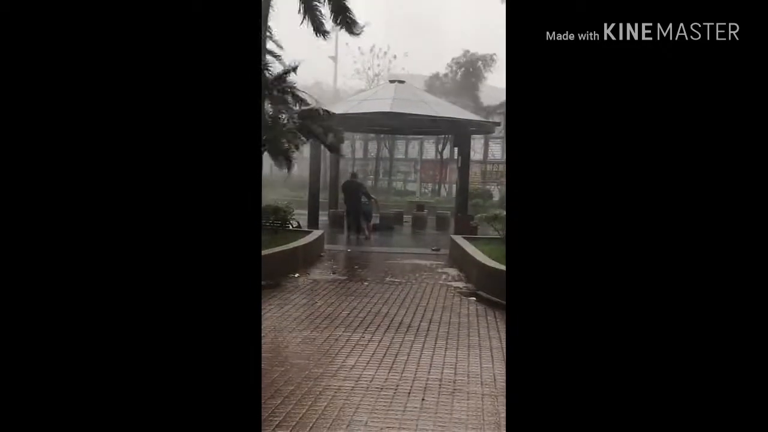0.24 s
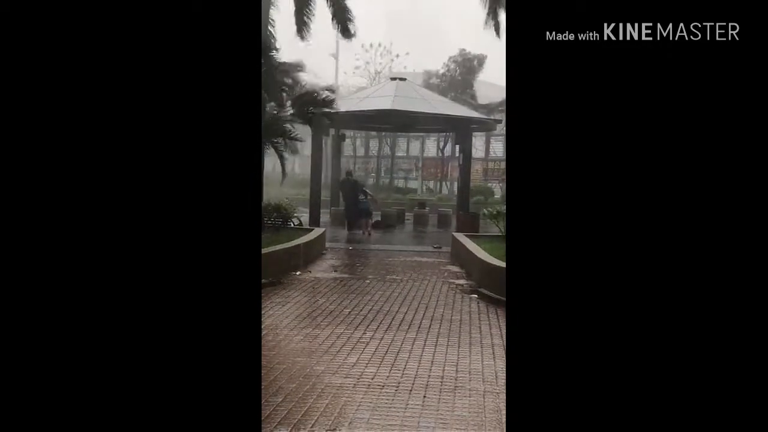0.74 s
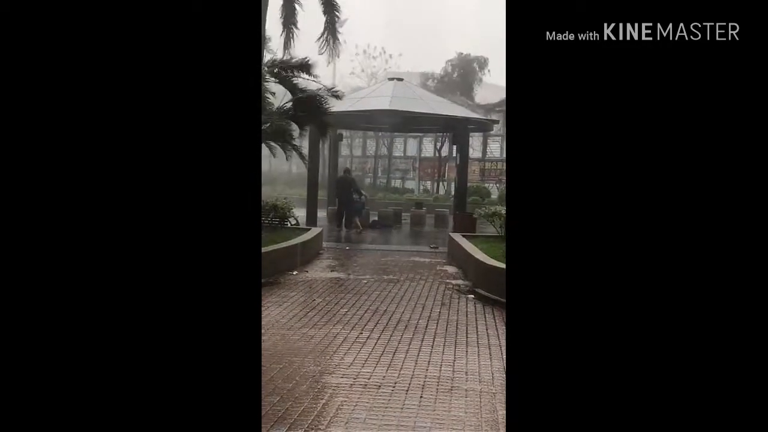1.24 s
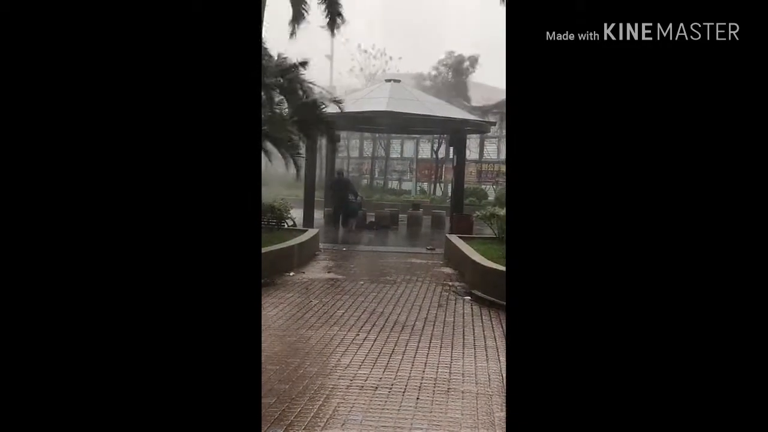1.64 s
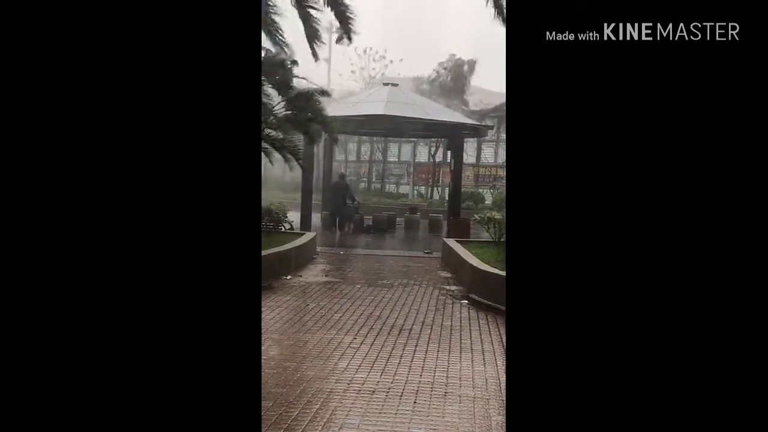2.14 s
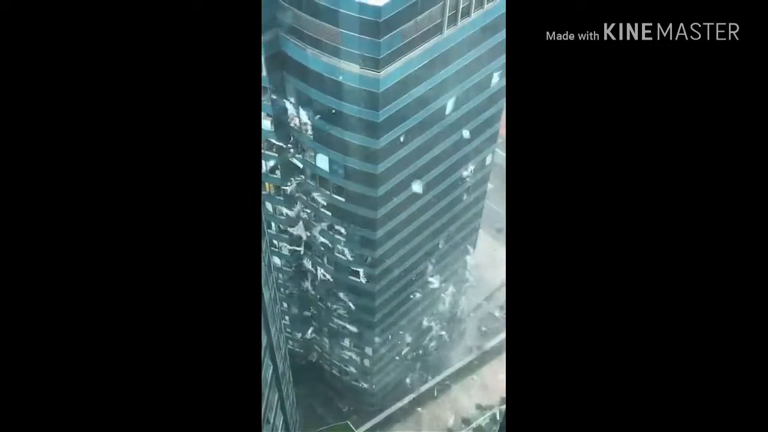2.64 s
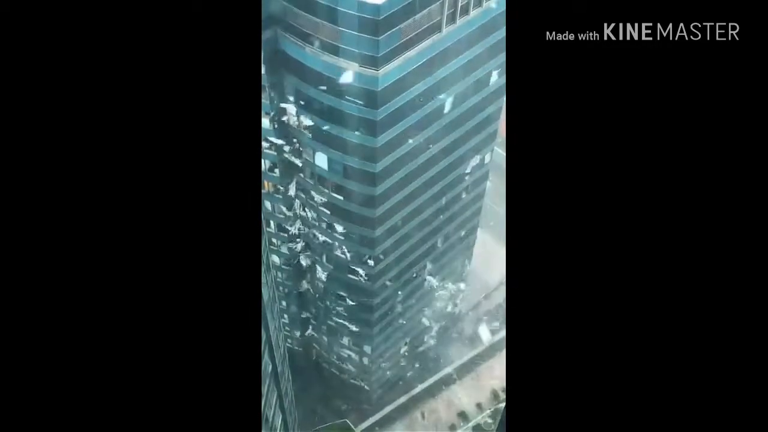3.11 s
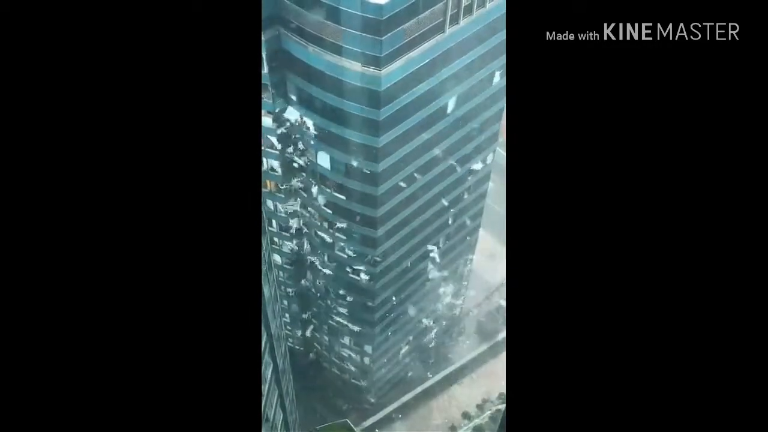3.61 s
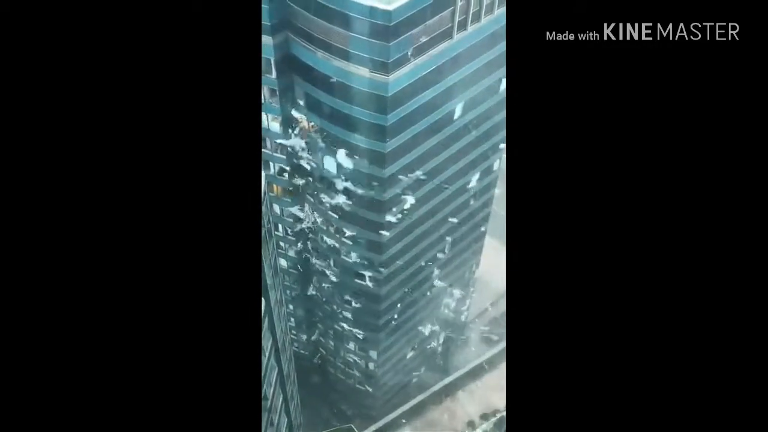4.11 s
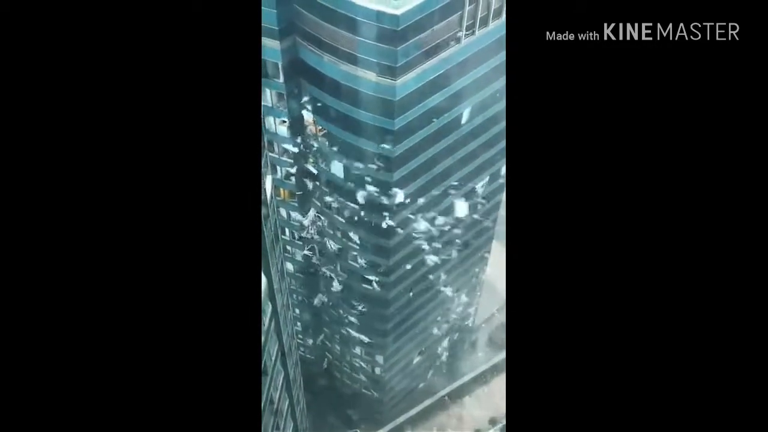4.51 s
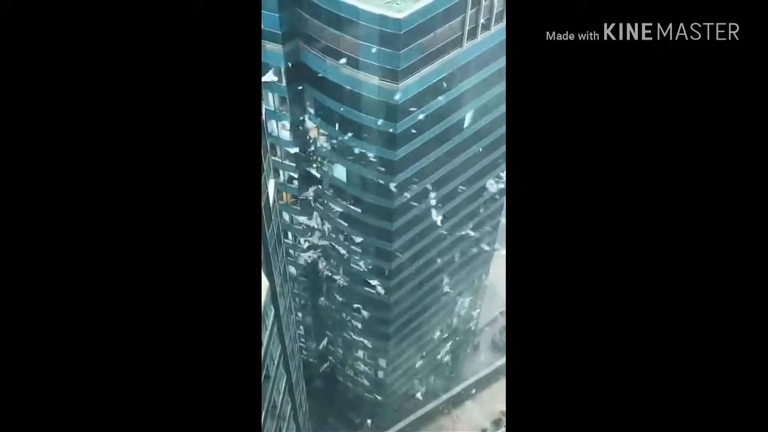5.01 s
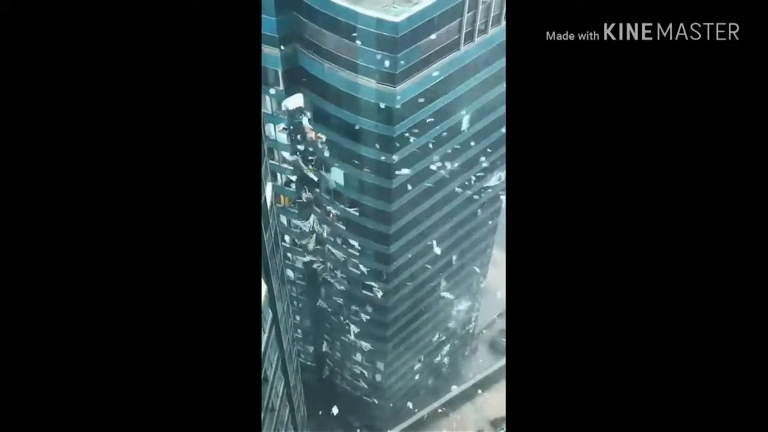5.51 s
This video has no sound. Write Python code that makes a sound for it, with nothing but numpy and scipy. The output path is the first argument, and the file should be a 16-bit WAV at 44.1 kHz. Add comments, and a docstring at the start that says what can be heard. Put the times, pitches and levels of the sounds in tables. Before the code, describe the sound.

A loud downpour and gusts outdoors cut to a muffled storm behind a high window, booming softly with faint whines and whistles.

```python
"""Dense rain hisses on paving and leaves around a microphone outdoors, while gusts buffet it.
That fades fast; then one hears the storm from behind a high window: the room booms at its low modes
and hums, wind leaks through the frame and rings it faintly, a slit whines, a gap whistles now and then.
Rain, gusts, boom and leak are shaped noise; drops and grit are wavelets; hum and whine are wandering
tones; knocks are decaying modes; whistles are narrow gliding noise. A bright hiss breaks in at the end."""
import sys
import numpy as np
from scipy import signal
from scipy.io import wavfile
from scipy.ndimage import uniform_filter1d

SR = 44100
rng = np.random.default_rng(int(sys.argv[2]) if len(sys.argv) > 2 else 0)


def pcm_store(signal):
    """Save signal as 16-bit PCM."""
    levels = np.round(np.clip(np.atleast_2d(signal), -1, 1) * 32767)
    wavfile.write(sys.argv[1], SR, levels.astype(np.int16).T)


N = 253573
T = np.arange(N) / SR  # s
INDOORS_START_S = 2.358


def gain_of(db):
    """Amplitude factor of a level in dB."""
    return 10 ** (np.asarray(db) / 20)


def evened(x):
    """Scale to an RMS of 1."""
    return x / np.sqrt(np.mean(x ** 2) + 1e-20)


def curve(points):
    """A level in dB for every sample, joined by straight lines."""
    t, db = np.transpose(points)
    return np.interp(T, t, db)


def read(points, hz):
    """A spectrum joined on a log axis, at -120 dB beyond its ends."""
    f, db = np.transpose(points)
    return np.interp(np.log(hz + 1), np.log(f + 1), db, left=-120, right=-120)


def wander(x, size):
    """Smooth white noise twice into a random drift of RMS 1; size in samples."""
    return evened(uniform_filter1d(uniform_filter1d(x, size=size), size=size))


def noise(spectrum, size, modes=(), patchy_db=0., flicker_db=0.):
    """Random short-time spectra with resonances, drifting patches and a flicker common to all pitches."""
    hop, hz = size // 4, np.fft.rfftfreq(size, 1 / SR)
    a, b, patches = rng.standard_normal((N // hop + 5, len(hz), 3)).T  # each: pitch by time
    patches = uniform_filter1d(patches, size=12, axis=0)
    patches = evened(uniform_filter1d(patches, size=10, axis=1))
    flicker = evened(uniform_filter1d(rng.standard_normal(a.shape[1]), size=5))
    resonances = sum(db / (1 + (2 * (hz - f) / width) ** 2) for f, width, db in modes)
    shape = gain_of(read(spectrum, hz) + resonances)
    frames = (a + 1j * b) * shape[:, None] * gain_of(patchy_db * patches + flicker_db * flicker)
    return evened(signal.istft(frames, nperseg=size, noverlap=size - hop)[1][:N])


def band_noise(low_hz, high_hz, size):
    """White noise through a third-order bandpass."""
    sos = signal.butter(3, [low_hz, high_hz], "band", fs=SR, output="sos")
    return signal.sosfilt(sos, rng.standard_normal(size))


def tick(hz, turns, rise=0.):
    """A drop's splash: a short wavelet of peak 1 whose pitch may rise as the bubble closes."""
    u = np.arange(-200, 200) / SR * hz  # cycles from the centre
    return np.cos(2 * np.pi * u * (1 + rise * u)) * np.exp(-.5 * (u / turns) ** 2)


def scatter(per_s, uneven_db, pitches, turns):
    """Wavelets at random moments, of uneven size and randomly chosen pitch."""
    size = gain_of(uneven_db * np.minimum(rng.exponential(1, N), 5))
    size = size * (rng.random(N) < per_s / SR)
    kind = rng.integers(0, len(pitches), N)
    layers = (signal.oaconvolve(size * (kind == k), tick(hz, turns), "same")
              for k, hz in enumerate(pitches))
    return evened(sum(layers))


def add(mix, s, sound):
    """Lay a sound into the mix from second s, cut at the end."""
    part = mix[round(s * SR):][:len(sound)]
    part += sound[:len(part)]


def drops():
    """Many near drops, each a wavelet of about one cycle."""
    return scatter(per_s=590, uneven_db=1.6, pitches=np.geomspace(2500, 11000, 16), turns=0.97)


def rain(storm_db):
    """Dense strikes merge into a hiss, with near drops on top; it follows the storm by a share."""
    # colour of the hiss: f/Hz, level/dB [relative, per Hz]
    colour = [(180, -34), (300, -8), (356, -3), (492, -12.5), (870, -4.5), (1720, -9.5), (3230, -10),
              (6080, -13.5), (9520, -18.5), (11300, -22), (12000, -32), (15600, -67), (22000, -120)]
    # evenly spaced hollows in the hiss: f/Hz, width/Hz, level/dB
    hollows = [(4930, 290, -3.5), (7620, 350, -3.5), (10300, 780, -3)]
    level_db, storm_share, drops_db = -32, 0.23, -17.5  # drops against the hiss
    hiss = noise(colour, size=512, modes=hollows, patchy_db=1.0, flicker_db=0.08)
    return gain_of(level_db + storm_share * storm_db) * evened(hiss + gain_of(drops_db) * drops())


def gusts(storm_db):
    """Wind buffets the microphone: low noise that follows the storm by a share."""
    # colour of the gusts: f/Hz, level/dB [relative, per Hz]
    colour = [(53, -33), (90, 3), (199, -5.5), (241, -4), (280, -9.5), (350, -8), (420, -17.5), (600, -15),
              (780, -28), (1320, -120)]
    level_db, storm_share = -32.5, 0.17
    return gain_of(level_db + storm_share * storm_db) * noise(colour, size=4096, patchy_db=0.7)


def thud(storm_db):
    """The deepest buffeting: noise that follows the storm fully."""
    # colour of the thud: f/Hz, level/dB [relative, per Hz]
    colour = [(12, -41), (20, -18), (54, 9.5), (110, 0), (140, -18), (240, -120)]
    return gain_of(-37.5 + storm_db) * noise(colour, size=8192)


def add_close_drops(mix):
    """Single drops strike close by, each a wavelet of rising pitch."""
    # close drops: t/s [centre], level/dB [peak], f/Hz
    close_drops = [(.4395, -24, 9000), (1.1280, -24, 8500), (1.7237, -19, 8200), (1.9925, -23, 6200)]
    for s, db, hz in close_drops:
        add(mix, s - 200 / SR, gain_of(db) * tick(hz, turns=1.7, rise=.09))


def outdoors():
    """Rain and wind at the open microphone, faded together."""
    # strength of the storm: t/s, level/dB [relative]
    storm = [(0, -3), (.2, 2), (1.3, 0), (1.75, -5), (2.0, -4), (2.25, -1.5)]
    # the outdoor sound dies away: t/s, level/dB [relative]
    fade = [(2.245, 0), (2.265, -8.5), (2.29, -10), (2.34, -19.5), (2.4, -22.5), (2.46, -46), (2.52, -56)]
    storm_db = curve(storm)
    out = rain(storm_db) + gusts(storm_db) + thud(storm_db)
    add_close_drops(out)
    return out * gain_of(curve(fade)) * (T < fade[-1][0])


def boom(wind_db):
    """The room resonates at its low modes and follows the wind by a share."""
    # colour of the boom: f/Hz, level/dB [relative, per Hz]
    colour = [(60, -33), (95, -7), (140, -1), (165, -9.5), (210, -6), (330, -21.5), (500, -13), (700, -56)]
    # low room modes: f/Hz, width/Hz, level/dB [above the boom]
    room_modes = [(122, 24, 1), (180, 23, 9), (280, 38, 9.5)]
    level_db, wind_share = -43, 0.4
    return gain_of(level_db + wind_share * wind_db) * noise(colour, size=8192, modes=room_modes, patchy_db=2.0)


def hum():
    """The strongest room mode: a tone that drifts and trembles, and at each throb swells onto a firm pitch."""
    # throbs of the hum: t/s [centre], length/s, f/Hz, level/dB [RMS at the centre]
    throbs = [(2.586, 0.057, 128, -33.5), (3, 0.15, 122, -33), (3.204, 0.053, 113.7, -37),
              (3.3, .12, 132, -36.5), (3.798, 0.065, 123.6, -33), (3.856, 0.05, 122, -34),
              (4.334, 0.05, 122.2, -30), (4.625, 0.11, 118.9, -31), (4.884, 0.17, 123.5, -37),
              (5.049, 0.1, 122, -36.5), (5.598, 0.23, 121.3, -37.5), (5.729, 0.12, 119, -37)]
    mean_hz, drift_hz, tremble_hz = 122.6, 5, 7.5  # slow and quick wander, RMS
    level_db, waver, rise_s = -42.5, 0.44, 0.066  # waver: RMS share of the gain
    quick, wobble, slow = rng.standard_normal((3, N))
    hz = mean_hz + drift_hz * wander(slow, 5000) + tremble_hz * wander(quick, 1200)
    gain = gain_of(level_db) * (1 + waver * wander(wobble, 1200))
    gain = gain * np.clip((T - INDOORS_START_S) / rise_s, 0, 1)
    for s, length, throb_hz, db in throbs:
        swell = np.cos(np.pi * np.clip((T - s) / length, -.5, .5)) ** 2
        hz = hz + np.sqrt(swell) * (throb_hz - hz)
        gain = gain + swell * (gain_of(db) - gain)
    return np.sqrt(2) * gain * np.sin(2 * np.pi * np.cumsum(hz) / SR)


def whine():
    """One slit sings: a thin tone of quickly wandering pitch, its level broken into short beads."""
    mean_hz, wander_hz, level_db, beads_db = 2242, 26, -62, 4  # wander and beads: RMS
    pitch, beads = (wander(v, 500) for v in rng.standard_normal((2, N)))
    phase = 2 * np.pi * np.cumsum(mean_hz + wander_hz * pitch) / SR
    return np.sqrt(2) * gain_of(level_db + beads_db * beads) * np.sin(phase)


def rumble():
    """Deep noise under the room, on a level curve of its own."""
    # level of the rumble: t/s, level/dB [RMS]
    level = [(2.36, -45), (2.55, -50), (2.75, -42), (3.5, -41.5), (3.85, -42), (4.15, -42.5), (4.5, -41.5),
             (5.2, -43.5), (5.75, -38.5)]
    # colour of the rumble: f/Hz, level/dB [relative, per Hz]
    colour = [(12, -45), (20, -15), (35, -11), (60, -4), (78, -1), (95, -1.5), (130, -16)]
    return gain_of(curve(level)) * noise(colour, size=8192)


def leak(wind_db):
    """Wind pressed through the window frame rings its modes faintly and follows the wind fully."""
    # colour of the leak: f/Hz, level/dB [relative, per Hz]
    colour = [(180, -40), (300, -2.5), (702, -5), (932, -7), (1180, -7.5), (1590, -5.5), (1970, -13),
              (2250, -13), (2410, -14), (4500, -26.5), (5850, -33.5), (9900, -120)]
    # modes of the window frame: f/Hz, width/Hz, level/dB [above the leak]
    frame_modes = [(796, 18, 1), (836, 35, 1), (926, 26, 8), (1106, 50, 3.5), (1270, 30, 6),
                   (1310, 49, 3.5), (1416, 54, 2.5), (1520, 32, 7), (1641, 38, 7), (1862, 35, 4),
                   (2200, 38, 0.5), (2223, 35, 4.5), (3110, 46, 5)]
    air = noise(colour, size=4096, modes=frame_modes, patchy_db=0.3, flicker_db=0.5)
    return gain_of(-44.5 + wind_db) * air


def far_rain(wind_db):
    """Distant rain through the glass: faint patchy hiss that follows the wind by a share."""
    # colour of the far rain: f/Hz, level/dB [relative, per Hz]
    colour = [(2400, -58), (4300, -3.5), (5300, -4.5), (7000, -10.5), (9000, -14), (11200, -19.5),
              (12100, -27)]
    level_db, wind_share = -65, 0.89
    hiss = noise(colour, size=1024, modes=[(7900, 90, 4)], patchy_db=2.3, flicker_db=.6)
    return gain_of(level_db + wind_share * wind_db) * hiss


def rustle(wind_db):
    """Grit ticks on the glass: sparse soft grains, each a brief ring, more than following the wind."""
    grains = scatter(per_s=90, uneven_db=2.1, pitches=np.geomspace(2500, 3500, 8), turns=4.5)
    return gain_of(-67.5 + 2.1 * wind_db) * grains


def shove(length, low_hz, high_hz, db):
    """A gust presses on the window: a soft swell of a band of noise."""
    size = round(length * SR)
    band = band_noise(low_hz, high_hz, size + 4000)[4000:]  # the filter settles first
    return gain_of(db) * evened(band) * signal.windows.tukey(size, .8)  # share spent rising and falling


def knock(db, t60, hz, top_hz, lag):
    """A soft blow rings the pane's modes, mostly near its own pitch, low ones later, with a puff of noise."""
    # modes of the struck pane: f/Hz, level/dB [relative]
    pane_modes = [(928, -4), (1290, 4), (1510, 3), (1650, -5), (1855, -6), (2245, 6), (2700, -9),
                  (3250, -8)]
    rise_s, first_hz, puff_db = .012, 2300, -9  # modes from first_hz up start at once
    t = np.arange(round((t60 + 2 * lag) * SR)) / SR

    def fall(u):
        """A short rise, then a decay of 60 dB in t60."""
        return np.clip(u / rise_s, 0, 1) * gain_of(-60 * u / t60)

    ring = 0
    for f, mode_db in pane_modes:
        level = gain_of(mode_db - 8.2 * abs(np.log2(f / hz)))  # weaker by 8.2 dB an octave away
        delay = lag * max(np.log2(first_hz / f), 0)
        ring = ring + level * fall(t - delay) * np.sin(2 * np.pi * (f * t + rng.random()))
    puff = band_noise(hz / 2.1, top_hz, len(t)) * fall(t)
    return gain_of(db) * evened(evened(ring) + gain_of(puff_db) * evened(puff))


def whistle(length, first_hz, last_hz, width, db, steady):
    """Air through a slit: a narrow gliding band of noise around a firmer core, sharp at the start."""
    accent_db, accent_s, flutter, flutter_hz = 6, .022, .25, 24
    t = np.arange(round(length * SR)) / SR
    raw = rng.standard_normal((2, len(t) + 4000))
    a, b = signal.lfilter(*signal.butter(2, width / 2, fs=SR), raw)[:, 4000:]  # the filter settles first
    phase = 2 * np.pi * np.cumsum(np.geomspace(first_hz, last_hz, len(t))) / SR
    band = (a + steady * a.std()) * np.cos(phase) + b * np.sin(phase)
    shape = np.minimum(t / 0.0048, 1) * np.minimum((length - t) / 0.011, 1)
    shape = shape * (1 + flutter * np.cos(2 * np.pi * flutter_hz * t))
    accent = accent_db * np.exp(-(t / accent_s) ** 2)
    return gain_of(db + accent) * evened(band) * shape


def closing_hiss():
    """A bright noise that breaks in at the end."""
    # level of the hiss: t/s, level/dB [RMS]
    level = [(5.7, -78), (5.73, -55), (5.745, -59)]
    # colour of the hiss: f/Hz, level/dB [relative, per Hz]
    colour = [(2350, -42), (4000, -12), (4410, -10), (4900, 0), (8590, -31), (9080, -14), (10100, -12),
              (12100, -19), (15700, -49), (22000, -120)]
    return gain_of(curve(level)) * (T > level[0][0]) * noise(colour, size=512)


def indoors():
    """The storm behind the window: steady room and window sounds, then the single events."""
    # wind on the window: t/s, level/dB [relative]
    wind = [(2.36, -5), (2.55, 0), (3.1, -.5), (3.45, 0.5), (3.85, -1), (4.3, 0.5), (5.2, -2), (5.5, -1.5),
            (5.75, -1)]
    # gusts that swell one band: t/s [start], length/s, low f/Hz, high f/Hz, level/dB [before the swell shape]
    shoves = [(2.63, 0.28, 200, 320, -50), (3.428, 0.087, 241, 333, -45.5), (4.171, 0.32, 160, 360, -41),
              (4.221, 0.46, 2300, 3280, -62), (5.3, 0.3, 3870, 5300, -65)]
    # dull knocks: t/s, level/dB [RMS], t60/s, pitch f/Hz, top of the puff f/Hz, lag/s [per lower octave]
    knocks = [(2.70, -57, 0.2, 2240, 2400, .01), (3.438, -49, 0.14, 1600, 2500, .03),
              (4.195, -60, .16, 2000, 2600, .01), (4.822, -58.5, 0.16, 2300, 3300, .01)]
    # whistles: t/s [start], length/s, first f/Hz, last f/Hz, width/Hz, level/dB [before accent and shape],
    # steadiness [core against noise]
    whistles = [(4.2, .028, 4250, 4150, 450, -61, 0.6), (4.42, .18, 2550, 2950, 350, -66, .6),
                (4.485, .03, 2780, 2740, 250, -63, .8), (4.824, .045, 3200, 3050, 450, -65, .5),
                (5.432, .04, 4170, 4110, 100, -69, 1.5), (5.54, .148, 4120, 4165, 200, -65, 1.35)]
    wind_db = curve(wind)
    out = boom(wind_db) + hum() + whine() + rumble()
    out += leak(wind_db) + far_rain(wind_db) + rustle(wind_db)
    for make, events in ((shove, shoves), (knock, knocks), (whistle, whistles)):
        for s, *settings in events:
            add(out, s, make(*settings))
    out += closing_hiss()
    return out * np.clip((T - INDOORS_START_S) / 0.0029, 0, 1)


def scene():
    """One microphone, outdoors and then behind the window, feeds both channels."""
    mono = outdoors() + indoors()
    return np.array([mono, mono])


def record(dry):
    """The band limit: a steep lowpass."""
    edge_hz = 11950
    lowpass = signal.firwin(1023, edge_hz, window=("kaiser", 9), fs=SR)
    return signal.oaconvolve(dry, lowpass[None], "same")


dry = scene()
out = record(dry)
pcm_store(out)
```